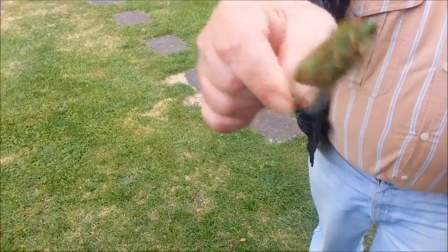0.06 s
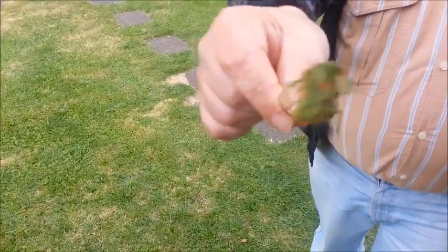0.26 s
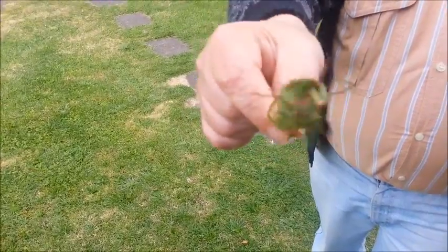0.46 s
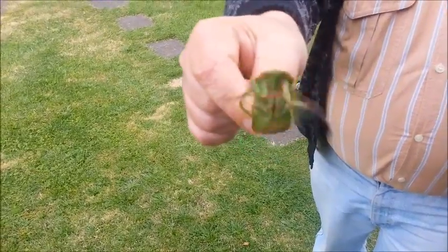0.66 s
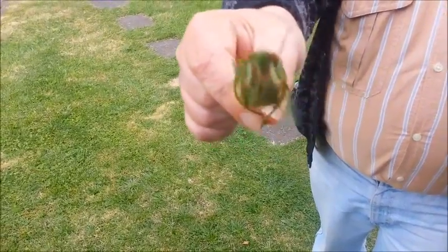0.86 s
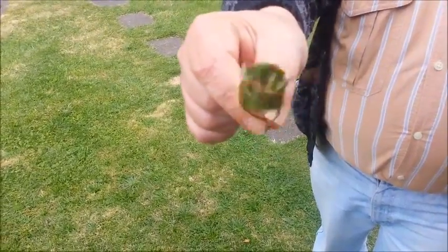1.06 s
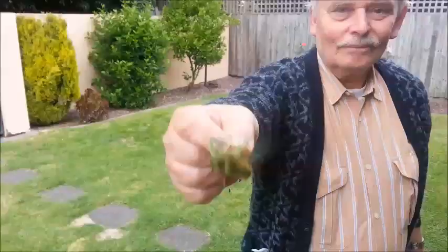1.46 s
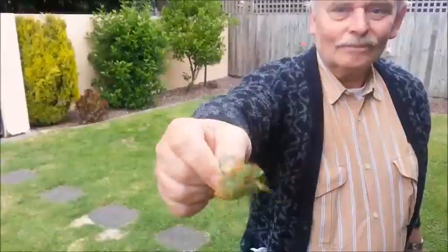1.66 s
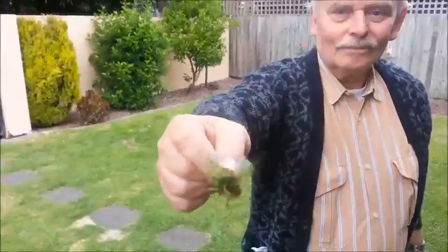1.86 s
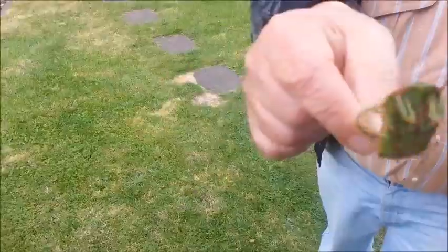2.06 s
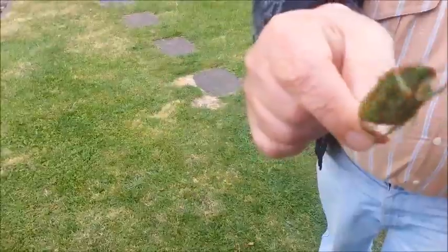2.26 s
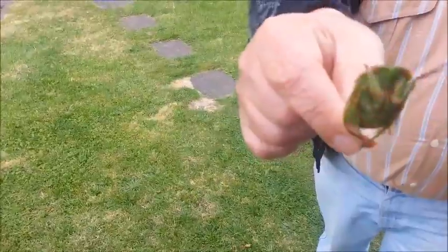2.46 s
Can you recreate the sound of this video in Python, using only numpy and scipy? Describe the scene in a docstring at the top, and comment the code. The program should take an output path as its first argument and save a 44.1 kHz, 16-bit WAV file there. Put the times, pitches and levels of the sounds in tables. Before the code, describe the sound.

A cicada held in the fingers buzzes right at the microphone in a quiet garden. Short runs of sharp, ringing clicks alternate with rasping, snapping wings, then the wing flutter takes over and dies away.

```python
"""A cicada buzzes between two fingers, right at the microphone, in a quiet garden.
Its tymbals (small drum skins on its body) buckle in short runs of ringing clicks that overload
the microphone. In between, its wings rasp and snap against the fingers and stir the air.
A far bird chirps twice, one puff of air hits the microphone, and the sound drops out once."""
import sys
import numpy as np
from scipy import signal
from scipy.fft import rfft, irfft
from scipy.io import wavfile
from scipy.ndimage import uniform_filter1d

SR = 44100
rng = np.random.default_rng(int(sys.argv[2]) if len(sys.argv) > 2 else 0)


def waveform_to_disk(signal):
    """Save audio, clipped to [-1, 1], as 16-bit WAV at the path in sys.argv[1]."""
    frames = np.transpose(np.atleast_2d(signal))
    scaled = np.clip(frames, -1, 1) * 32767
    samples = np.round(scaled).astype(np.int16)
    wavfile.write(sys.argv[1], SR, samples)


N = 114660
TIME = np.arange(N) / SR
TOP_HZ = 15800   # upper edge of the sound
SNAP_DECAY_S = 0.00082   # how fast a wing snap or a tymbal crack dies away


def from_db(db):
    """Turn decibels into a factor to multiply by."""
    return 10 ** (np.asarray(db) / 20)


def rms_one(x):
    """Scale a sound so that its average strength (rms) is 1."""
    return x / np.sqrt(np.mean(x ** 2) + 1e-20)


def add(out, s, sound):
    """Mix a short sound in, starting at s seconds."""
    i = max(int(s * SR), 0)
    out[..., i:i + sound.shape[-1]] += sound[..., :N - i]


def bandpass(x, low_hz, high_hz, order=2):
    """Keep mainly what lies between two frequencies."""
    return signal.sosfilt(signal.butter(order, [low_hz, high_hz], "band", fs=SR, output="sos"), x)


def response(points):
    """A tone filter through (f/Hz, level/dB) points that rings only after a hit, never before."""
    hz, db = np.transpose(points)
    grid = np.maximum(np.arange(N // 2 + 1) * SR / N, 1)
    gain = from_db(np.interp(np.log(grid), np.log(hz), db))
    cepstrum = irfft(np.log(gain))
    cepstrum[1:N // 2] *= 2   # doubling one half and dropping the other puts the ringing after the hit
    return np.exp(rfft(cepstrum[:N // 2], N))


def drift(hz):
    """A random wobble, about 1 in size, at about this rate."""
    return np.interp(TIME * hz * 2, np.arange(N), rng.standard_normal(N))


def ping(hz, rise_s, sag_hz_per_s=0, scatter=0.014):
    """A short ring, slightly off pitch by chance, that swells and dies; its pitch can sag."""
    t = TIME[:SR // 100]
    sag = sag_hz_per_s * rise_s * 4 * np.tanh(t / rise_s / 4)
    pitch = hz * (1 + scatter * rng.standard_normal()) - sag
    swell = t / rise_s * np.exp(1 - t / rise_s)
    return swell * np.sin(2 * np.pi * np.cumsum(pitch) / SR)


def spread(mid, side, levels):
    """Spread two noises across left and right, following (t/s, level/dB) points."""
    stereo = rms_one(mid + from_db(-3.5) * np.array([side, -side]))
    return from_db(np.interp(TIME, *np.transpose(levels))) * stereo


def echoes(x, fade_s):
    """A blur of reflections, different left and right, that falls by 60 dB in fade_s."""
    tail = rng.standard_normal((2, SR // 2)) * from_db(-60 * TIME[:SR // 2] / fade_s)
    tail /= np.sqrt(np.sum(tail ** 2, axis=1, keepdims=True))
    return signal.fftconvolve(x, tail, axes=1)[:, :N]


def hush():
    """A soft, dull background hush that dips and swells back at set times."""
    # tone of the hush: f/Hz, relative level/dB
    tone = [(25,-3),(60,3.5),(130,1.5),(320,3),(600,-4),(1000,-7.5),(1800,-13.5),(2800,-15.5),(8000,-22),(14000,-25),(16000,-59.5)]
    # level of the hush: t/s, level/dB
    levels = [(0,-51.5),(.15,-46.5),(.35,-47.5),(.56,-57),(.68,-52.5),(.9,-45.5),(1.05,-47),(1.2,-50),(1.42,-47),(1.6,-51.5),(1.85,-46),(2.02,-51.5),(2.2,-48.5),(2.34,-47),(2.6,-56)]
    mid, side = irfft(rfft(rng.standard_normal((2, N))) * response(tone))
    return spread(mid, side, levels)


def bird(hoarseness=0.064):
    """A far bird gives faint falling whistles, made hoarse by a fast wobble in pitch."""
    # chirps: t/s, length/s, start f/Hz, end f/Hz, level/dB
    chirps = [(0.148,.06,3650,1530,-42.5),(0.176,0.08,3750,1850,-45)]
    out = np.zeros(N)
    for s, length, start_hz, end_hz, db in chirps:
        progress = np.clip((TIME - s) / length, 0, 1)
        hz = start_hz * (end_hz / start_hz) ** progress * (1 + hoarseness * drift(400))
        out += from_db(db) * np.sin(np.pi * progress) * np.sin(2 * np.pi * np.cumsum(hz) / SR)
    return out


def draught():
    """The fanning wings push a little air past the microphone: a soft, low rustle."""
    # loudness of the stirred air: t/s, level/dB
    levels = [(0,-59),(.25,-54),(.5,-64),(1.0,-72),(1.45,-68),(1.58,-44.5),(1.68,-51.5),(1.8,-46.5),(2.02,-46.5),(2.15,-63),(2.6,-62)]
    mid, side = bandpass(rng.standard_normal((2, N)), 140, 395, order=3)
    return spread(mid, side, levels)


def puff(start_s=0.6745, hz=83, fade_s=0.024, left_right_db=(-58, -10.5)):
    """A puff of air hits the microphone and gives one low swing that dies at once."""
    t = np.maximum(TIME - start_s, 0)
    swing = (t > 0) * np.cos(2 * np.pi * hz * t) * from_db(-60 * t / fade_s)
    thump = signal.sosfilt(signal.butter(2, 600, fs=SR, output="sos"), swing + 1e-18)
    return np.outer(from_db(left_right_db), thump)


def wing_rasp(attack_s=0.002, release_db_per_s=1100, slips_per_s=3400, judder_hz=262.5, judder_db=4):
    """The wings rub on the fingers in juddering strokes, each made of tiny slips and hiss."""
    # wing strokes: t/s, length/s, relative level/dB
    strokes = [(.062,0.019,-43.5),(0.112,0.036,-37.5),(0.164,0.015,-24.5),(0.186,0.062,-39.5),(0.236,0.0236,-16.5),(0.263,0.016,-8.5),(0.292,0.013,-21),(0.305,0.019,-16),(0.333,0.033,-22.5),
               (0.364,0.035,-15),(0.44,0.029,-24.5),(.484,0.0092,-10),(0.563,0.018,-15),(0.589,0.036,-28),(0.63,0.021,-21.5),(0.688,0.018,-23.5),(0.717,.044,-15),(.764,.04,-51),
               (0.8,0.045,-19),(0.853,0.022,-11.5),(0.876,.01,-23),(.89,.03,-32),(0.903,.012,-18.5),(0.913,0.028,-11.5),(0.966,.024,-15.5),(0.987,0.052,-31),(1.057,.024,-16.5),(1.077,0.028,-13.5),(1.121,.008,-27),
               (1.15,.009,-11.5),(1.159,0.015,-14.5),(1.185,0.038,-19),(1.233,0.024,-9.5),(1.259,.028,-18),(1.285,0.015,-14.5),(1.306,0.011,-23),(1.401,0.024,-14.5),
               (1.457,0.033,-18.5),(1.467,0.0042,-7.5),(1.507,.024,-13),(1.55,.025,-20),(1.563,0.017,-13),(1.582,0.088,-19.5),(1.655,0.016,-13),(1.673,0.099,-17),(1.783,0.048,-25),
               (1.82,0.013,-12),(1.843,0.068,-21),(1.92,0.019,-15),(1.952,0.033,-17.5),(2.001,0.038,-16.5),(2.084,0.0066,-13.5),(2.09,.022,-27.5),(2.126,0.024,-17.5),
               (2.16,0.041,-37.5),(2.198,0.0095,-9.5),(2.212,0.0074,-14.5),(2.231,0.071,-18),(2.323,0.019,-23),(2.352,0.057,-44)]
    pressure = np.zeros(N)
    for s, length, db in strokes:
        rise = np.clip((TIME - s) / attack_s + 0.5, 0, 1)
        fall_db = release_db_per_s * np.clip(TIME - s - length, 0, 0.5)
        pressure = np.maximum(pressure, rise * from_db(db - fall_db))
    sizes = from_db(3 * np.minimum(rng.exponential(1, N), 4)) * rng.choice([-1, 1], N)
    slips = rms_one(sizes * (rng.random(N) < slips_per_s / SR))
    hiss = 0.75 * rng.standard_normal((2, N))
    judder = from_db(judder_db * drift(judder_hz))
    return from_db(-3) * pressure * rms_one((slips + hiss) * judder)


def wing_snaps(tick_db=-5, ring_db=-13.5):
    """A wing catches and snaps free with a tick and a short, high ring."""
    # snaps: t/s, relative level/dB
    snaps = [(.101,-21.5),(0.109,-26),(0.138,-14),(.154,-13.5),(0.214,-13),(.262,-7.5),(0.2741,-4),(0.3069,-4),(0.314,-10),(0.3205,-7.5),(0.3539,3.5),(0.546,-5.5),(0.5706,-6),(0.6345,-5),(0.652,-12),(0.6776,-1.5),
             (0.7246,-13),(0.7263,-7),(0.7405,-5),(0.7503,-11),(0.759,-5),(0.848,-23),(0.8725,0),(.9833,-0.5),(1.0888,5),(1.1022,0.5),(1.1544,2.5),(1.1746,-7.5),(1.1935,-1.5),
             (1.2094,-5),(1.218,-1),(1.2536,-4),(1.292,0.5),(1.3001,-0.5),(1.413,2),(1.416,-8),(1.4215,-1),(1.4833,0),(1.53,1),(1.6118,2),(1.6628,-7.5),
             (1.684,-3.5),(1.715,-10),(1.747,-16),(1.77,-10),(1.8484,-11.5),(1.8685,-3),(1.9302,-9),(1.973,-11.5),(2.086,1.5),(2.1107,-4.5),(2.1392,-8.5),(2.2177,-9),(2.251,-7),(2.2751,-6),(2.293,-8.5),(2.336,-6.5),(2.369,-19.5),(2.399,-25),(2.532,-38.5)]
    out, t = np.zeros(N), TIME[:SR // 100]
    for s, db in snaps:
        tick = from_db(tick_db) * np.exp(-t / SNAP_DECAY_S) * rng.choice([-1, 1], len(t))
        ring = from_db(ring_db) * ping(hz=7005, rise_s=0.0006, scatter=0.07)
        add(out, s, from_db(db) * (tick + ring))
    return out


def wing_turning(x, treble_above_hz=9000, middle_below_hz=6500, waver_hz=9, waver_db=1.33):
    """The tone wanders as the wings turn: each band of frequencies wavers in level on its own."""
    # slow changes of tone: t/s, treble level/dB, middle and bass level/dB
    tone_changes = [(0,10.5,6),(.28,-3.5,-4),(.55,2.5,3),(.75,-3,-0.5),(1.0,-4.5,1),(1.2,-1.5,-1),(1.449,-0.5,-1.5),(1.65,2,0.5),(1.85,4,1.5),(2.05,4,1.5),(2.3,2,2.5)]
    s, treble_db, middle_db = np.transpose(tone_changes)
    spectrum, hz = rfft(x), np.arange(N // 2 + 1) * SR / N
    centres, spacing = np.linspace(0, TOP_HZ, 17, retstep=True)
    out = 0
    for centre in centres:
        band = irfft(spectrum * np.maximum(1 - abs(hz - centre) / spacing, 0))
        curve_db = treble_db * (centre > treble_above_hz) + middle_db * (centre < middle_below_hz)
        out = out + band * from_db(np.interp(TIME, s, curve_db) + waver_db * drift(waver_hz))
    return out


def wings():
    """The rasp and snaps have a hollow, ringing tone, different at the left and right microphones."""
    # tone at the left microphone: f/Hz, relative level/dB
    left_tone = [(60,-44.5),(300,-34.5),(1000,-31),(1600,-23),(2100,-37),(3200,-14.5),(4600,-19.5),(5600,-7),(6300,-8.5),(6900,-20),(7800,-17),(9300,-22.5),(12500,-22.5),(14400,-27.5),(15200,-56),(16000,-65.5)]
    # tone at the right microphone: f/Hz, relative level/dB
    right_tone = [(60,-32),(300,-34),(1000,-52.5),(1500,-20.5),(2200,-23.5),(3100,-37.5),(4000,-18),(4800,-16),(6200,-3),(7100,3),(7800,0.5),(8600,-16),(9600,-8.5),(11400,-9),(13000,-18.5),(14400,-23.5),(15200,-56.5),(16000,-77.5)]
    tone = np.array([response(left_tone), response(right_tone)])
    shaped = irfft(rfft(wing_rasp() + wing_snaps()) * tone)
    right_gain = np.sqrt(np.mean(abs(tone[1]) ** 2))
    return wing_turning(shaped) / right_gain


def tymbals(belly_hz=4128, hz_per_db=9, rebound_s=0.0053, rebound_db=-5.5, right_lag_s=0.00007):
    """Each buckle thuds, cracks and rings the belly and a brighter note; then the skin springs back."""
    # tymbal clicks: t/s, belly ring level/dB, bright ring level/dB, knock level/dB (all relative)
    clicks = [(0.3757,5.5,13,-8),(0.3823,8.5,-2,8.5),(0.3901,7,1,5.5),(.4003,1.5,-26,7),(0.4063,0.5,-13.5,0.5),(0.4164,-6,-28,-17),(0.4231,-2.5,-14.5,-22),(0.4495,-19.5,-31,-24),
              (0.4878,9.5,0,8),(0.4943,7,-7.5,16),(0.504,3,-1,9.5),(0.5127,-1,-15,-6),(0.5416,-4.5,-10.5,-20),(0.608,-10,-12,-20),(0.6174,-6.5,-16.5,-24),(0.6732,-5.5,0,-17),(0.7002,-8.5,-10,-21),(0.707,-10,-9,-26),
              (0.8087,10.5,10.5,15.5),(0.8169,2,15.5,1),(0.8259,-0.5,1.5,0.5),(0.8347,-5.5,-18,-27),(0.9164,9.5,7,14.5),(0.9233,4,9.5,3.5),(0.9326,0,4,-1.5),(.9410,-4.5,-7,-4.5),(.9500,-5,-2.5,-22),
              (1.0307,5.5,6,-15.5),(1.0522,-7.5,-3,-15),(1.3432,8.5,7,7),(1.3524,3,8,8),(1.3599,2.5,0.5,3),(1.3684,-4,-3.5,-6.5),(1.3785,-7.5,-11.5,-26),(2.1053,8.5,-11.5,-4)]
    belly, flank, bright, kicks, knocks = np.zeros((5, N))
    for s, belly_db, bright_db, knock_db in clicks:
        hz = belly_hz + hz_per_db * belly_db   # harder clicks ring higher
        belly_ring = ping(hz, rise_s=0.0006, sag_hz_per_s=291000, scatter=0.025)
        flank_ring = ping(hz=3343, rise_s=0.0015)   # a lower note of the belly
        bright_ring = ping(hz=7600, rise_s=0.00051, sag_hz_per_s=146000, scatter=0.021)
        delay_s = rebound_s * (1 + 0.1 * rng.standard_normal())
        rebound = ping(hz=6970, rise_s=0.00025, scatter=0.035)
        add(belly, s, from_db(belly_db) * belly_ring)
        add(flank, s, from_db(belly_db) * flank_ring)
        add(bright, s, from_db(bright_db) * bright_ring)
        add(bright, s + delay_s, from_db(bright_db + rebound_db) * rebound)
        add(kicks, s, from_db([belly_db]))
        add(knocks, s, from_db([knock_db]))
    fading_kicks = signal.lfilter([1], [1, -np.exp(-1 / (SNAP_DECAY_S * SR))], kicks + 1e-18)
    crack = from_db(-11) * bandpass(fading_kicks * rng.standard_normal((2, N)), 3000, 11000)
    thud = from_db(1.5) * bandpass(knocks + 1e-18, 90, 810)
    rings = (np.outer(from_db([0, -4.5]), belly)   # each pair is left, right
             + np.outer(from_db([-21, -32.5]), flank)
             + np.outer(from_db([-15.5, 4.5]), bright))
    left, right = rings + crack + thud
    return np.array([left, np.interp(TIME - right_lag_s, TIME, right)])


def scene():
    """The cicada and its reflections, over the sounds of the garden."""
    cicada = tymbals() + wings()
    near = from_db(-15) * echoes(cicada, fade_s=0.047)   # off hand and body
    far = from_db(-24) * echoes(cicada, fade_s=0.28)   # off lawn and fence
    return cicada + near + far + hush() + draught() + bird() + puff()


def record(dry, ceiling=0.93, hardness=4.1, gap_start_s=2.041, gap_end_s=2.083, gap_db=-26):
    """Loud clicks overload the microphone, the level dips briefly, and the highest treble is cut."""
    clipped = dry / (1 + abs(dry / ceiling) ** hardness) ** (1 / hardness)
    gap = uniform_filter1d(1.0 * ((TIME > gap_start_s) & (TIME < gap_end_s)), size=100)
    treble_cut = signal.cheby2(12, 60, TOP_HZ + 700, fs=SR, output="sos")
    return signal.sosfilt(treble_cut, clipped * from_db(gap_db * gap))


dry = scene()
out = record(dry)
waveform_to_disk(out)
```